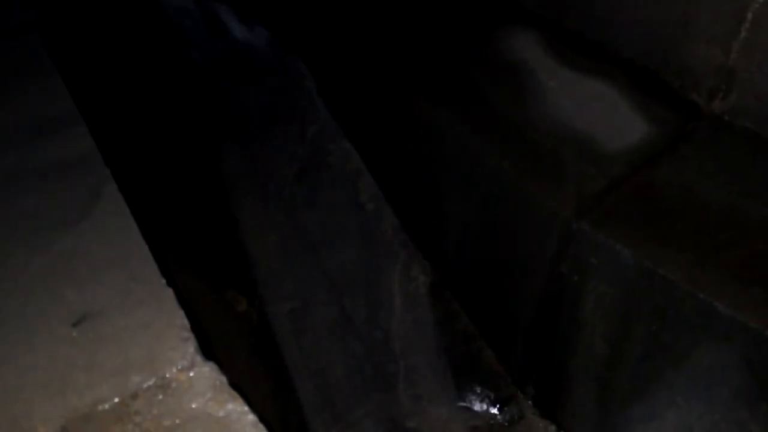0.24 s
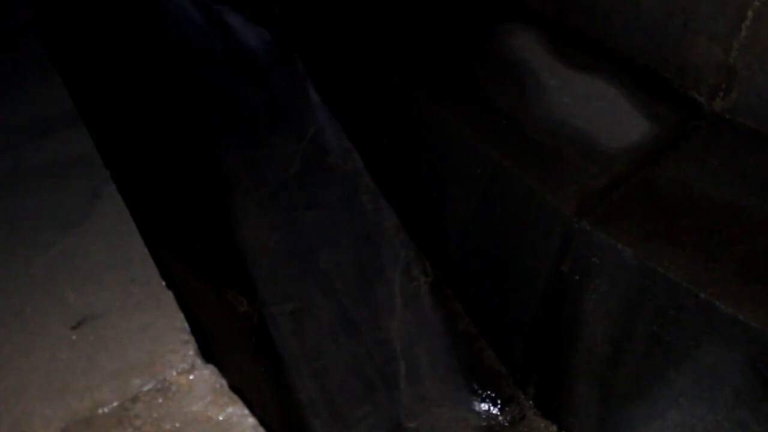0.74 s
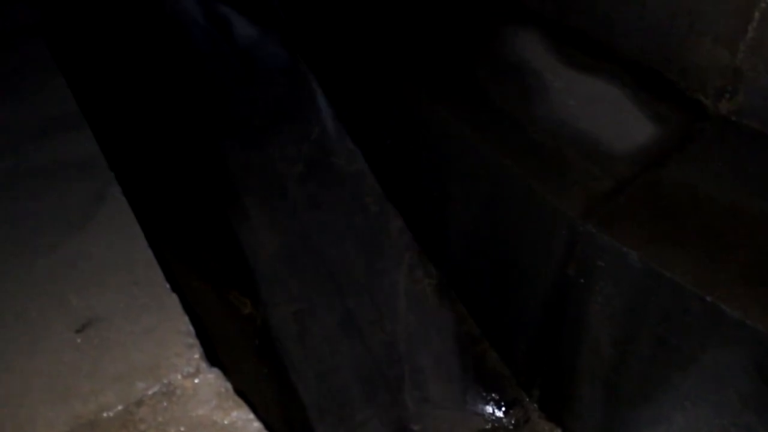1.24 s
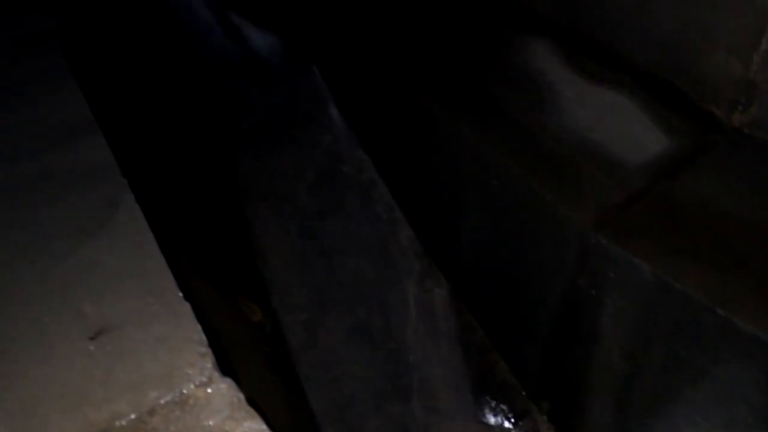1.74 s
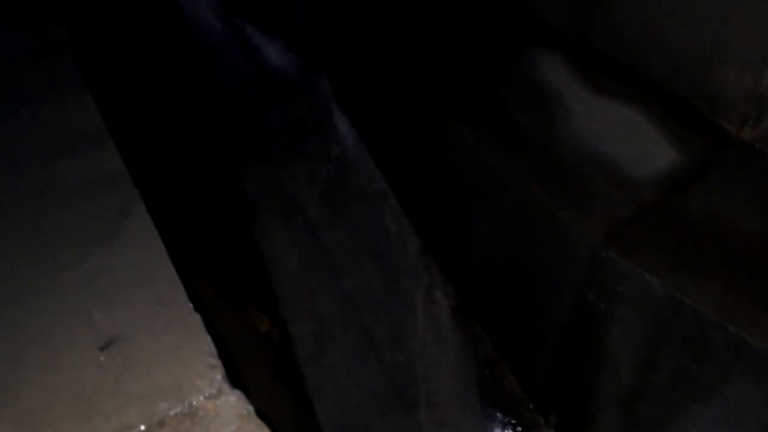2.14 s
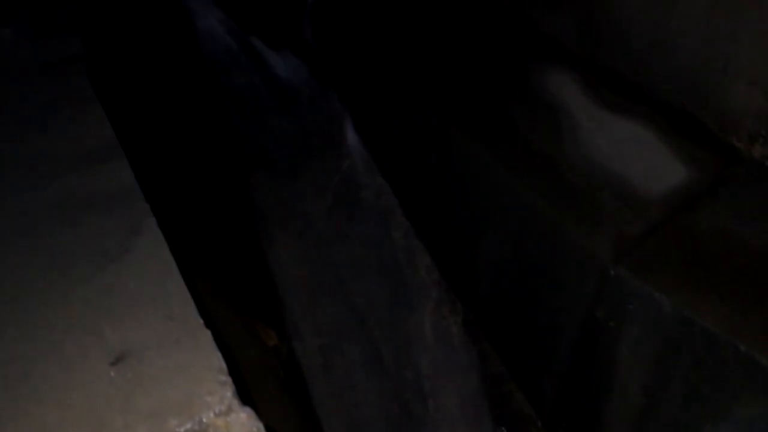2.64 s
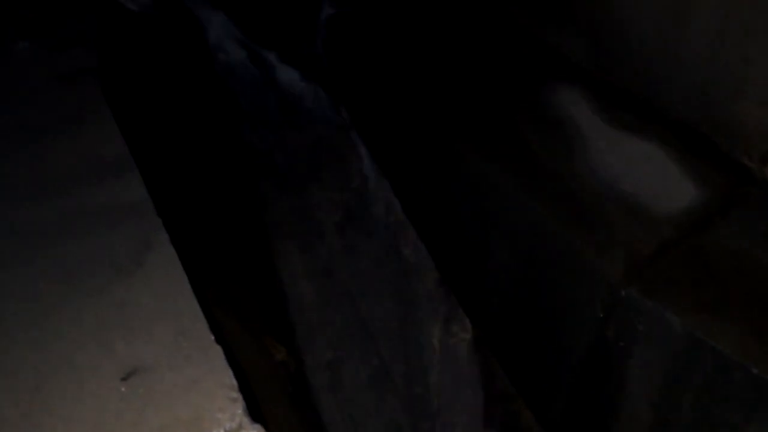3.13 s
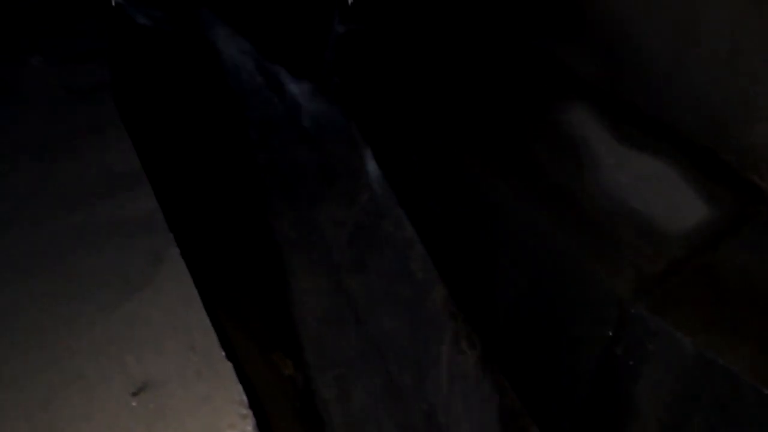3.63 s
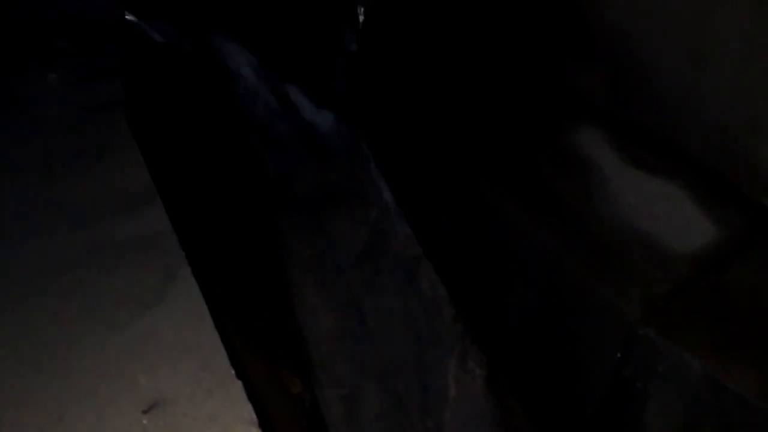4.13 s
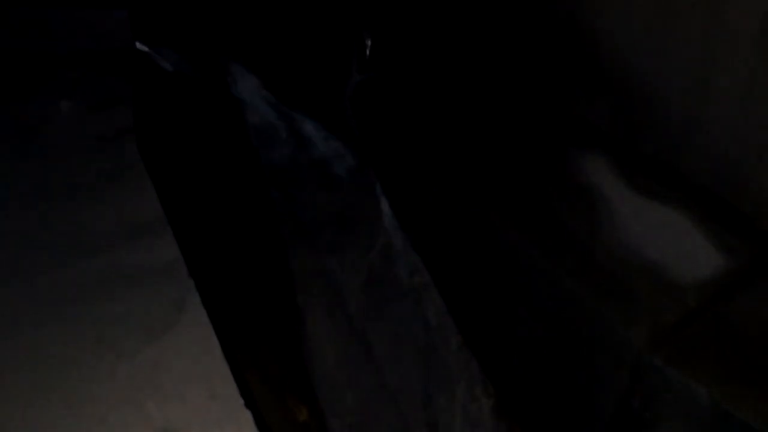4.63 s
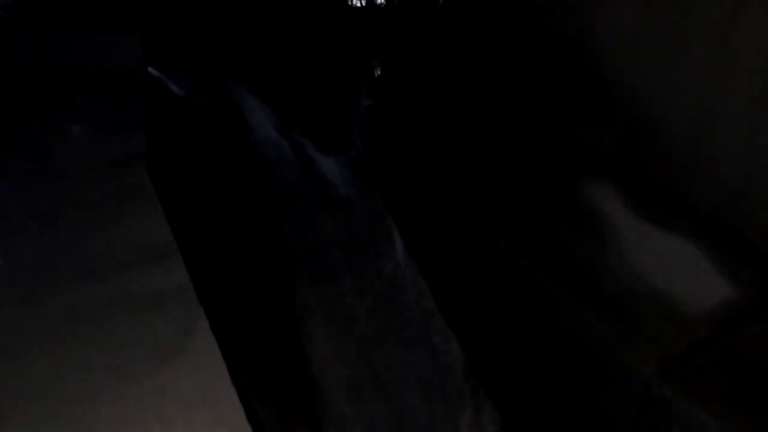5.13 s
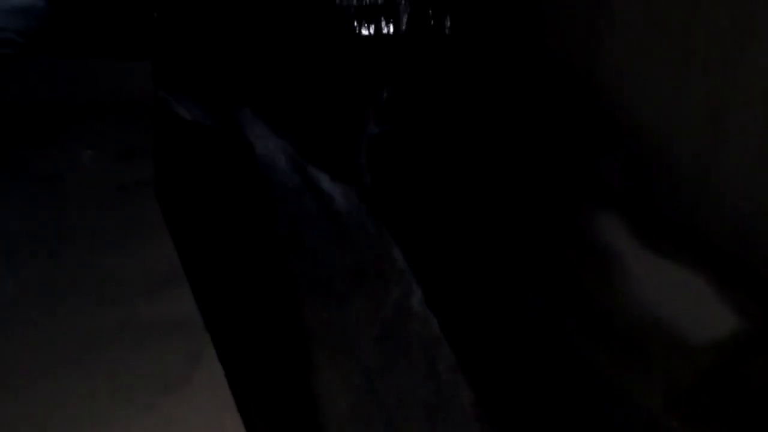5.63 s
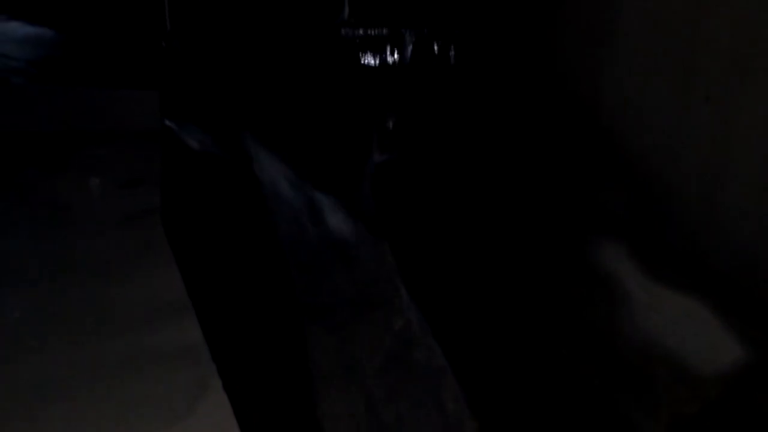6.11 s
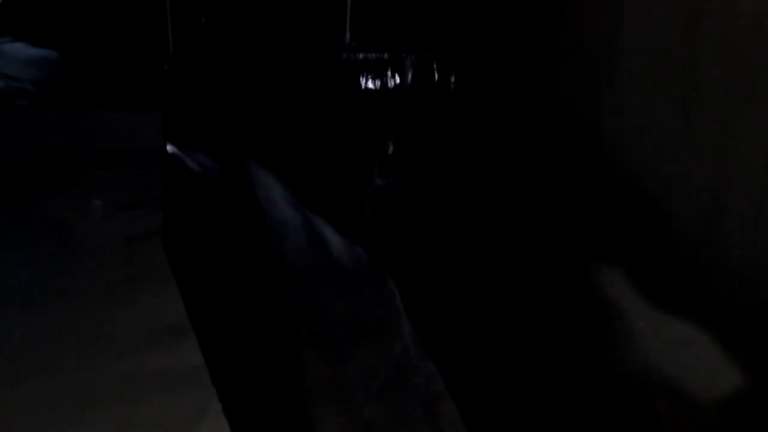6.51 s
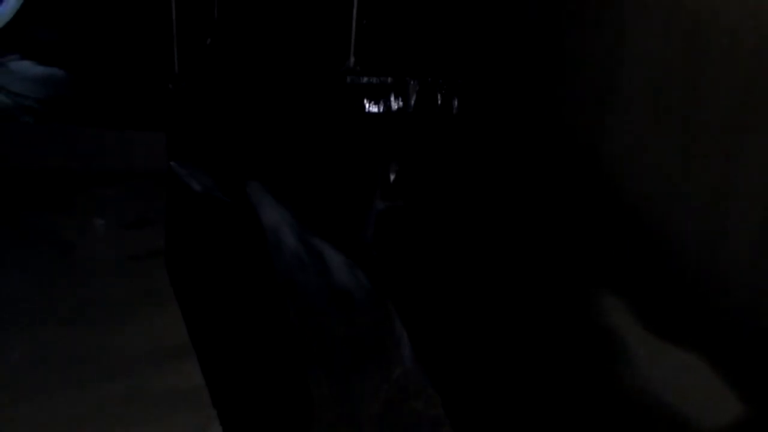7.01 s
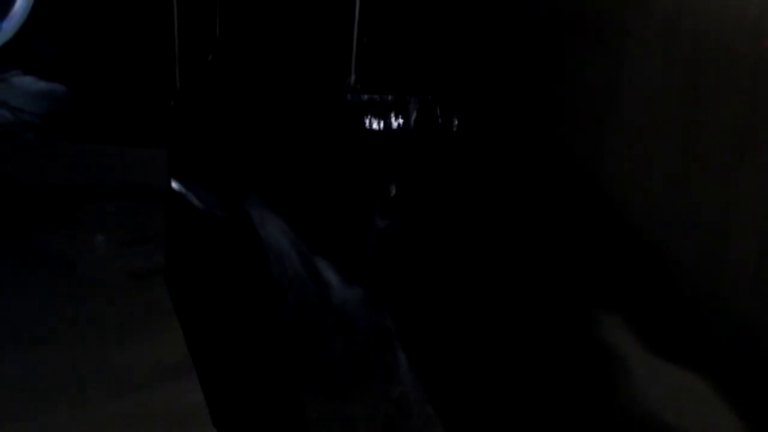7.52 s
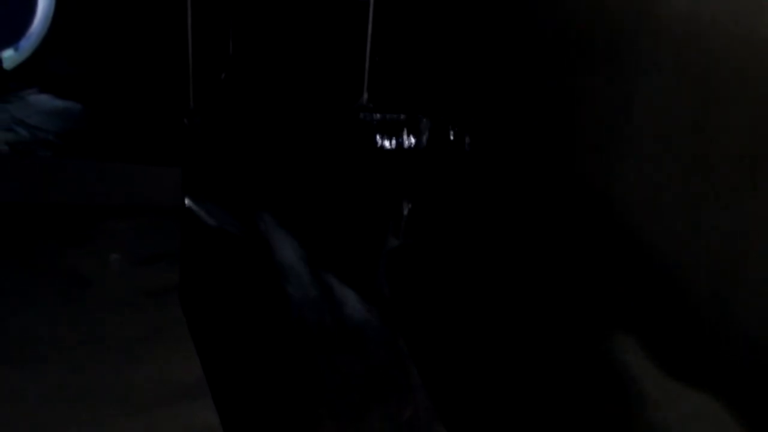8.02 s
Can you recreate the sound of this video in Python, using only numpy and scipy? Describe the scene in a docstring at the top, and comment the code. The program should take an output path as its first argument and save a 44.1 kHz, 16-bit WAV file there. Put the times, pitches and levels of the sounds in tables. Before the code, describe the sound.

Inside a large concrete drain tunnel, water pours without pause. A bright, midrange-to-treble hiss of spray dominates, fizzing with tiny bubbles, while froth gurgles below and a quiet plunge rumbles low. Small ripples of strength pass through, and a few faint deep gulps come in the second half. Hard walls leave a ringing, echoing tail on the bubbles. One steady microphone, centred mono, already running at start and end.

```python
"""Water pours steadily through a large concrete drain tunnel, heard at a single microphone.
Its spray hisses in small surges: patchy noise threaded with swarms of ringing, rising bubbles.
Below it, froth churns and gurgles, the plunge roars low, and air pockets gulp one low note each.
The walls give the bubbles a long tail, and standing waves across the bore lift narrow bands of it all."""
import sys
import numpy as np
from scipy import signal
from scipy.fft import rfft, irfft, next_fast_len
from scipy.io import wavfile
from scipy.ndimage import uniform_filter1d, map_coordinates

SR = 44100
rng = np.random.default_rng(int(sys.argv[2]) if len(sys.argv) > 2 else 0)


def dump(signal):
    """Clip the signal to [-1, 1] and save it as 16-bit WAV at the path in sys.argv[1]."""
    limited = np.clip(np.atleast_2d(signal).T, -1, 1)
    pcm = np.round(limited * 32767).astype(np.int16)
    wavfile.write(sys.argv[1], SR, pcm)


N = 364266

# colour of the spray: (frequency [Hz], relative level [dB])
SPRAY_COLOUR = [(900, -39), (1400, -7), (1650, -3), (2250, 0), (2650, -2), (3100, -3), (3450, -6.5),
                (4200, -8), (5600, -11.5), (6800, -15.5), (8500, -23), (11800, -31), (15600, -38.5)]
SPRAY_DB = -24  # mean level before the bore


def spray(flow_db):
    """Countless droplets merge into a hiss, with tiny bubbles fizzing and tinkling in it."""
    hiss = turbulence(patchy_db=0.47, size=(24, 16))
    fizz = bubbles(count=12000, low_hz=1294, high_hz=13960, cycles=2.7, rise=0.036, spread_db=4.5)
    tinkle = bubbles(count=4000, low_hz=1399, high_hz=3397, cycles=12.3, rise=0.032, spread_db=3.5)
    echoing_fizz = tunnel(fizz, wet_db=0)
    echoing_tinkle = tunnel(tinkle, wet_db=6)
    water = hiss + amp(-9) * echoing_fizz + amp(-16) * echoing_tinkle
    # the sheet breaks up and lands in clumps
    splatter_db = 0.44 * wobble(30) + 0.42 * wobble(110)
    return amp(SPRAY_DB + flow_db + splatter_db) * coloured(water, SPRAY_COLOUR)


# colour of the churning water: (frequency [Hz], relative level [dB])
FROTH_COLOUR = [(300, -45), (430, -13), (500, -6.5), (690, -4), (800, -1), (970, 0.5), (1170, -1.5),
                (1330, -5.5), (1550, -17.5), (2100, -43)]
CHURN_DB = -30.5  # mean level before the bore
FROTH_FOLLOWS = 0.75  # dB gained for each dB of stream strength
FROTH_RATE, FROTH_HEAVE_DB = 8, 0.5  # its own heaving: knots a second, depth in dB


def churn(flow_db):
    """Larger bubbles gurgle in the froth where the stream dives under."""
    froth = turbulence(patchy_db=0.5, size=(4, 14))
    gurgle = bubbles(count=2400, low_hz=400.5, high_hz=1502, cycles=10.1, rise=0.039, spread_db=3.5)
    water = froth + amp(-16.5) * tunnel(gurgle, wet_db=-0.5)
    heave_db = FROTH_HEAVE_DB * wobble(FROTH_RATE)
    return amp(CHURN_DB + FROTH_FOLLOWS * flow_db + heave_db) * coloured(water, FROTH_COLOUR)


# colour of the plunge: (frequency [Hz], relative level [dB])
PLUNGE_COLOUR = [(20, -43), (40, -34), (55, -26), (95, -17.5), (120, -12.5), (152, -14.5), (190, -1),
                 (270, -0.5), (360, -0.5), (430, 0), (520, -13), (800, -60)]
PLUNGE_DB = -45.5  # mean level before the bore
PLUNGE_FOLLOWS = 0.7  # dB gained for each dB of stream strength
PLUNGE_RATE, PLUNGE_HEAVE_DB = 5, 0.75  # its own heaving: knots a second, depth in dB


def plunge(flow_db):
    """The falling mass of water stirs a low, hollow roar."""
    roar = coloured(turbulence(patchy_db=0.5, size=(2, 30)), PLUNGE_COLOUR)
    heave_db = PLUNGE_HEAVE_DB * wobble(PLUNGE_RATE)
    return amp(PLUNGE_DB + PLUNGE_FOLLOWS * flow_db + heave_db) * roar


# big air pockets that gulp under the plunge:
# (start [s], pitch [Hz], peak level before the bore [dB], swell to the peak [s])
AIR_POCKETS = [(4.51, 316, -44, .04), (5.1, 192, -44, .05), (5.23, 284, -42, 0.05),
               (6.18, 231.5, -46, 0.044), (7.43, 255, -45, 0.046), (7.72, 236, -46, .05)]


def gulps():
    """Each air pocket sounds one low note, which builds up and fades."""
    notes = np.zeros(N)
    for start, hz, db, swell in AIR_POCKETS:
        t = np.maximum(np.arange(N) / SR - start, 0)
        envelope = t / swell * np.exp(1 - t / swell)
        notes += amp(db) * envelope * np.sin(2 * np.pi * hz * t)
    return notes


# slow drift of the stream's strength: (time [s], level offset [dB])
STREAM_DRIFT = [(0, 0), (.8, -0.2), (2.5, 0.03), (4.5, 0), (6, 0), (7.2, 0.5), (8.26, -0.5)]
# brief surges (+) and lulls (-) of the stream: (middle [s], length between 1/e points [s], change [dB])
STREAM_SURGES = [(2.5, .09, 1.7), (3.216, .05, 1.5), (3.27, 0.045, -2.5), (3.48, .12, 1),
                 (3.755, 0.11, -1.8), (4.1, .07, 0.9), (5.17, 0.12, 1), (5.842, 0.034, 1), (5.875, .05, -3),
                 (8.02, 0.088, -2.3)]
SLOSH_RATE, SLOSH_DB = 12, 0.32  # random sloshing: knots a second, depth in dB


def stream():
    """Strength of the stream in dB: a slow drift, constant sloshing and a few brief surges and lulls."""
    t = np.arange(N) / SR
    surges_db = np.zeros(N)
    for middle, length, db in STREAM_SURGES:
        surges_db += db * np.exp(-(2 * (t - middle) / length) ** 2)
    return curve(STREAM_DRIFT) + SLOSH_DB * wobble(SLOSH_RATE) + surges_db


def turbulence(patchy_db, size):
    """White noise with drifting patches of gain, size = (bins, frames) each."""
    grid = signal.stft(rng.standard_normal(N), nperseg=512)[2]
    field = uniform_filter1d(rng.standard_normal(grid.shape), size[0], 0)
    field = uniform_filter1d(field, size[1], 1)
    patchy = grid * amp(patchy_db * unit(field))
    return unit(signal.istft(patchy, nperseg=512)[1][:N])


def bubbles(count, low_hz, high_hz, cycles, rise, spread_db):
    """A swarm of bubbles: each rings for some cycles and climbs in pitch as it nears the surface."""
    when, pitch, life = rng.random((count, 3)).T[:, :, None]
    strength = amp(spread_db * np.clip(rng.standard_normal((count, 1)), -2, 2))
    hz = low_hz + (high_hz - low_hz) * pitch
    # samples per ring, capped so that a large swarm stays affordable
    n = np.arange(min(int(4 * cycles * SR / low_hz), 5000000 // count))
    turns = hz * n / SR
    age = turns / (cycles * (life + 0.5))  # in decay times
    tone = np.sin(2 * np.pi * turns * (1 + rise * age / 2))
    ring = strength * np.sqrt(hz) * np.exp(-age) * tone
    place = ((when * N).astype(int) + n) % N  # late rings wrap to the start
    return unit(np.bincount(place.ravel(), ring.ravel(), N))


# concrete walls: (frequency [Hz], time to fall 60 dB [s])
WALL_DECAY = [(200, 1.3), (1000, 1.4), (3000, 0.74), (10000, .3)]


def tunnel(x, wet_db):
    """Direct sound plus the walls' long tail, already built up; the treble dies first."""
    hz, t, grid = signal.stft(rng.standard_normal(SR), SR, nperseg=256)
    decay = np.exp(-np.log(1000) * t / along(WALL_DECAY, hz)[:, None])
    tail = signal.istft(grid * decay, SR, nperseg=256)[1]
    # circular convolution carries the end's tail into the start
    wet = unit(irfft(rfft(x) * rfft(tail, N), N))
    return unit(x + amp(wet_db) * wet)


# standing waves across the bore: (frequency [Hz], width [Hz], lift [dB])
BORE_MODES = [(215.4, 18, 4.5), (263, 11, 2.5), (497, 22, 0), (988, 18, 0.5)]


def bore(hz):
    """The tunnel's cross modes lift narrow bands of the rush, each as a resonant peak."""
    response = 1
    for mode, width, db in BORE_MODES:
        damping = 1j * hz * width
        response = response + (amp(db) - 1) * damping / (mode ** 2 - hz ** 2 + damping)
    return response


def amp(db):
    """Decibels to gain."""
    return 10 ** (np.asarray(db) / 20)


def unit(x):
    """x at rms 1."""
    return x / np.sqrt(np.mean(x ** 2) + 1e-20)


def along(points, hz):
    """(frequency [Hz], value) points read on a log axis."""
    f, v = np.transpose(points)
    return np.interp(np.log(hz + 1), np.log(f + 1), v)


def curve(rows):
    """(time [s], value) rows as one value per sample."""
    return np.interp(np.arange(N) / SR, *np.transpose(rows))


def wobble(rate):
    """A smooth random curve, rate knots a second."""
    knots = rng.standard_normal(int(N * rate / SR) + 4)
    return map_coordinates(knots, [np.arange(N) * rate / SR])


def filtered(x, response):
    """x times a response of frequency."""
    m = next_fast_len(N + SR // 2)
    return irfft(rfft(x, m) * response(np.fft.rfftfreq(m, 1 / SR)), m)[:N]


def coloured(x, spectrum):
    """x shaped by (frequency [Hz], level [dB]) points, at rms 1."""
    return unit(filtered(x, lambda hz: amp(along(spectrum, hz))))


def scene():
    """One stream drives spray, froth and plunge; with the gulps they sound through the bore, in mono."""
    flow_db = stream()
    water = spray(flow_db) + churn(flow_db) + plunge(flow_db) + gulps()
    rush = filtered(water, bore)
    return np.array([rush, rush])


TOP_HZ = 15750  # band limit


def record(dry):
    """Each channel ends sharply at the band limit, with nothing kept above it."""
    return np.array([filtered(channel, lambda hz: hz < TOP_HZ) for channel in dry])


dry = scene()
out = record(dry)
dump(out)
```